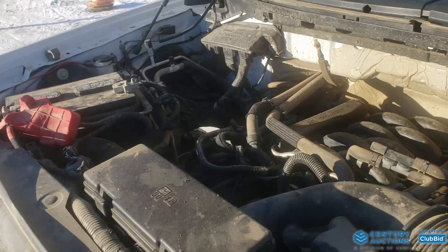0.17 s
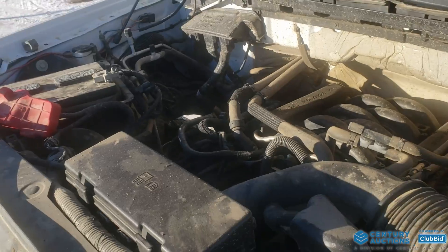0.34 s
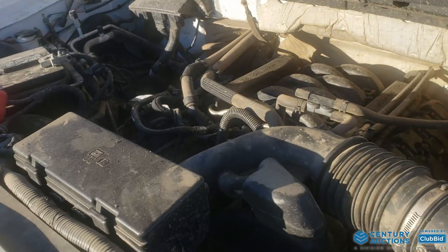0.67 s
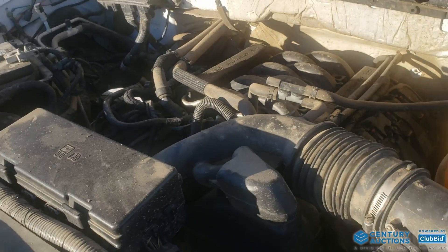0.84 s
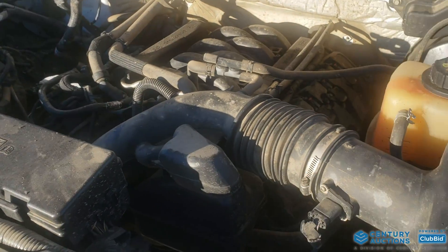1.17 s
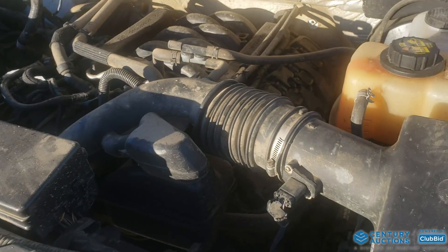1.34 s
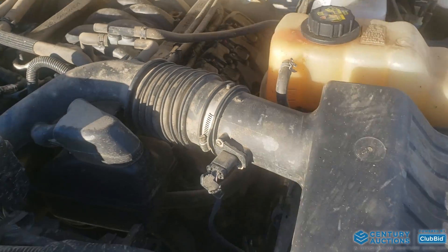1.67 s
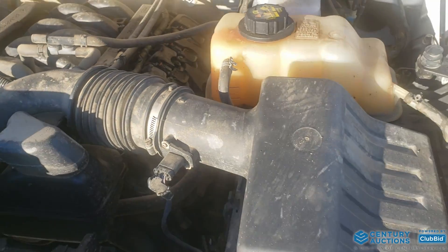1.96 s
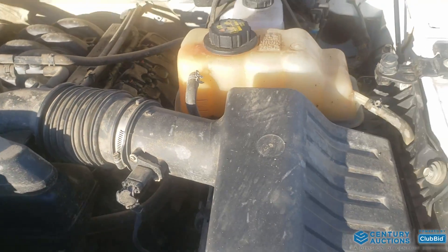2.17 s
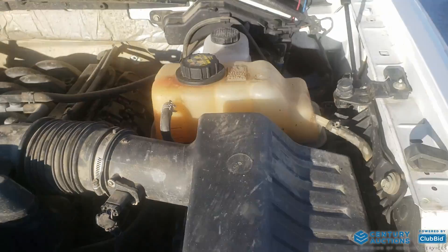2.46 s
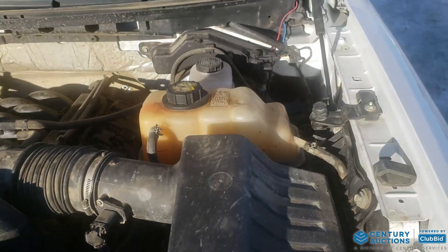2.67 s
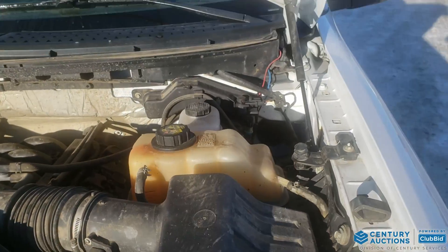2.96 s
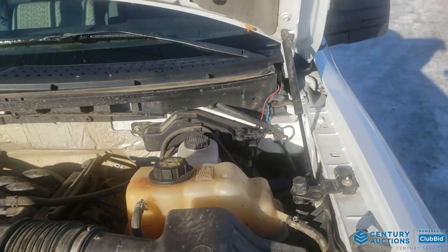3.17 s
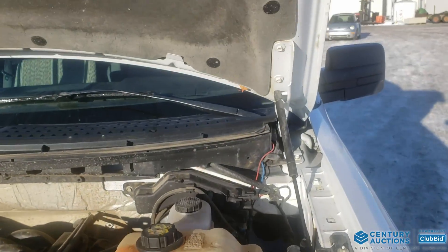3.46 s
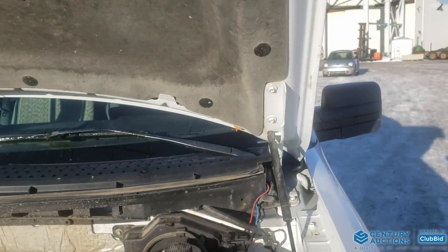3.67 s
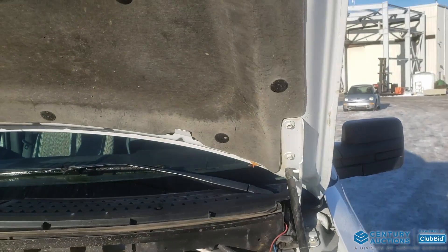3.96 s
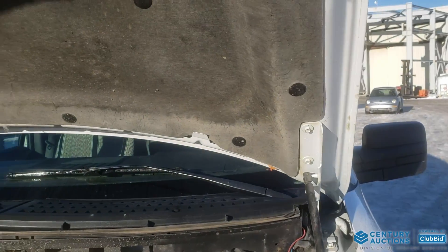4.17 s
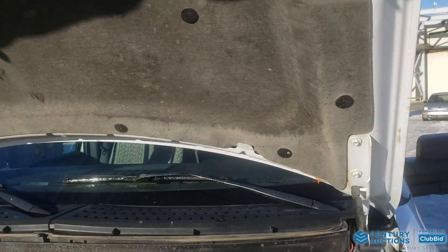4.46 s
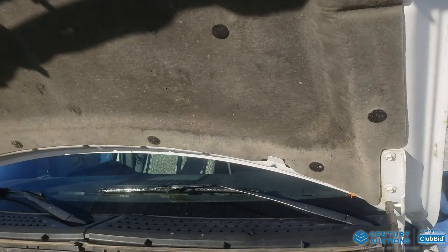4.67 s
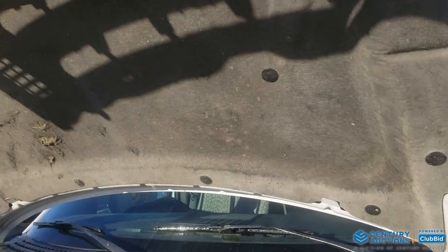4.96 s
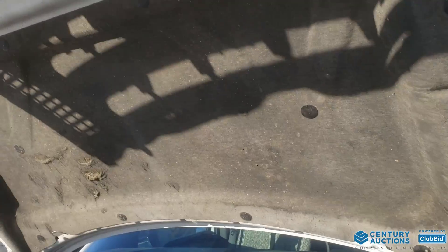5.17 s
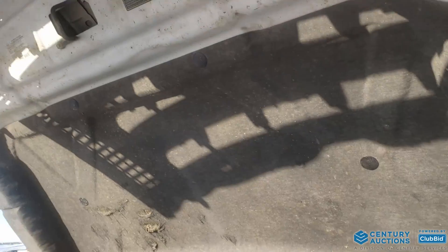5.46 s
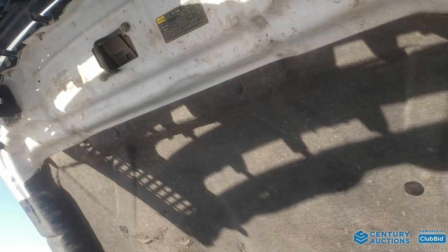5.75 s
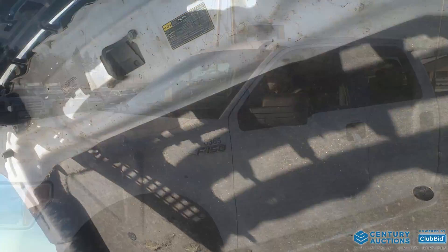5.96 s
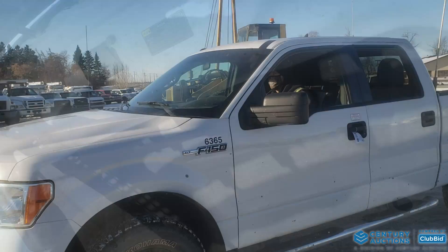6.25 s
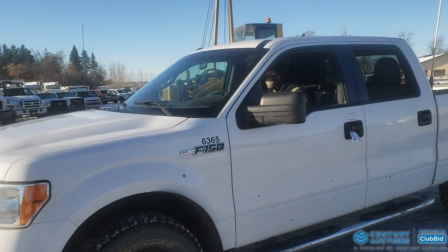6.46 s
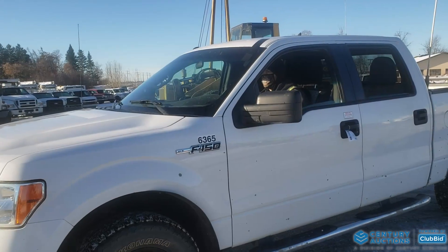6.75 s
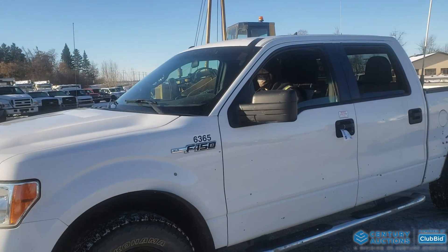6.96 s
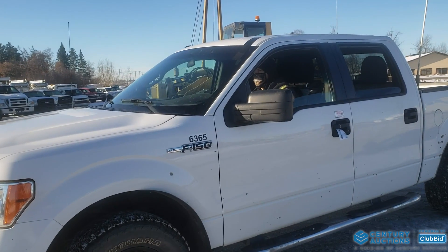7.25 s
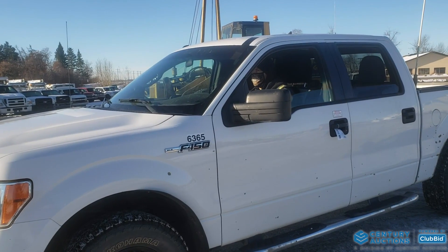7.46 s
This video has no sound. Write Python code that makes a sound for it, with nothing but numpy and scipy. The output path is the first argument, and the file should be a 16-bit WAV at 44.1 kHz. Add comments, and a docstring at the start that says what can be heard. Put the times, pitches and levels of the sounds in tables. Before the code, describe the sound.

The microphones are close over the open bay of a parked V8 pickup outdoors. It starts at a low, clattering idle with a soft exhaust rumble. At about 0.3 s the throttle opens with a breathy gasp and a deep duct thump; the intake booms and growls as revs race up, peaking near 0.95 s with a hissing rush of air. The throttle shuts just after 1 s and the pitch sinks slowly until about 3.2 s, with metallic ringing, valve chatter, belt-drive whine and a thin, fluttering high whistle. At 3.2 s a second quick blip, with a weaker gasp but harder bark, climbs higher to about 3.75 s, then coasts down for over two seconds. From 5.9 to 6.4 s this dissolves into the truck idling a few metres away: much quieter, low uneven exhaust puffs, light ticking that rises again near 7.3 s, faint tones and open-yard noise until the end.

```python
"""A V8 pickup engine in park, blipped twice, with the microphones over its open bay.
The throttle gasps and hisses with noise; the intake booms at the firing pitch; repeating shocks ring the
block, covers and exhaust; sines locked to the crank give the belt-drive whine and a chord of orders.
As the revs sink, narrow noise strands whistle past the shut throttle. Near the end this dissolves into
the same truck idling a few metres away in an open yard: exhaust puffs, clatter, tones and yard noise."""
import sys
import numpy as np
from scipy import signal
from scipy.fft import rfft, irfft, next_fast_len
from scipy.io import wavfile
from scipy.ndimage import uniform_filter1d, map_coordinates

SR = 44100
rng = np.random.default_rng(int(sys.argv[2]) if len(sys.argv) > 2 else 0)


def wav_record(signal):
    """Record a signal, one row per channel, as 16-bit PCM in the file named by sys.argv[1]."""
    frames = np.transpose(np.atleast_2d(signal))
    bounded = np.clip(frames, -1, 1)
    # unit amplitude maps onto the largest positive 16-bit level
    quanta = np.round(bounded * 32767).astype(np.int16)
    wavfile.write(sys.argv[1], SR, quanta)


N = 336041

# Crank speed, smoothed later: time_s, speed_rpm
CRANK_SPEED = [(.3, 930), (.45, 1362), (.57, 1885), (.72, 2714), (.88, 3378), (.96, 3441), (1.05, 3345),
               (1.2, 2976), (1.6, 2610), (2, 2152), (2.3, 1865), (2.9, 1453), (3.18, 1365), (3.25, 1610),
               (3.37, 2206), (3.56, 3350), (3.64, 3735), (3.7, 3860), (3.74, 3885), (3.79, 3845),
               (3.89, 3680), (3.94, 3570), (4.2, 3310), (4.3, 3185), (4.9, 2288), (5.4, 1790), (6.2, 1320)]
FULL_LOAD_RPM_PER_S = 5800  # climb of the revs under full load
MANIFOLD_FILL_S = 0.034  # lag of the load as it builds and dies away
# Pedal blips: opens_s, shuts_s, gasp_db, rush_db, gulp_db,
# then trims: boom_db, block_db, roar_db, valves_db, whine_db, whistle_db
BLIPS = [(0.331, 1.038, -30.5, -29, -23, 2.5, -0.012, -7.5, 0.83, -4, -0.11),
         (3.2, 3.61, -57, -39, -36, 0, 0.071, 0.5, 0.045, -0.5, 2.5)]

# Loudness laws: coast_db at MID_RPM, coast_db_per_octave of speed, extra_db_per_octave above KNEE_RPM,
# full_load_db at MID_RPM, full_load_db_per_octave
AIRBOX_LAW = (-40.5, 3.5, 7, -29.5, 10.5)
BLOCK_LAW = (-36, 2, 9, -29.5, 6.5)
VALVE_LAW = (-35.5, 9, 6.5, -37, 14)
HISS_LAW = (-42.5, 1, 13.5, -45, -18)
EXHAUST_LAW = (-37.5, -3.5, 15.5, -25.5, -6.5)
LOW_RPM, MID_RPM, KNEE_RPM = 1300, 2076, 2700  # the per-octave slopes go flat below LOW_RPM
ROAR_GROWTH, BOOM_GROWTH = 0.79, 1.8  # powers of the load for combustion noise and boom

# Firing tone at its own pitch, before the blip trim, under load and at any load: pitch_hz, level_db
BOOM = [(62, -20), (76, -23), (91, -1), (105, -2), (126, -6.5), (150, -14.5), (180, -26), (245, -43)]
HUM = [(60, -43), (90, -53), (120, -42), (150, -37), (175, -31.5), (215, -37.5), (255, -33.5)]
# Once a cycle the boom drops out between two surges: place_cycles, width (in sine of phase), depth_ratio
STUMBLE = (.005, .3, .75)
# Overtones of the firing before the duct: crank_multiple, level_db
GROWL_ORDERS = [(8, 0), (12, -1)]
# The duct's answer to those overtones: frequency_hz, gain_db
GROWL_DUCT = [(90, -43), (130, -31), (165, -15.5), (195, -30), (230, -26), (270, -20.5), (300, -26.5),
              (345, -57), (500, -69)]
# Colour of the intake gulps: frequency_hz, level_db (per Hz)
INTAKE_DUCT = [(45, -31), (85, -3), (160, -5), (230, -16), (280, -6.5), (350, -52), (900, -70)]
GULP_HZ, GULP_DELAY_S, GULP_WIDTH_S = 118, 0.01, 0.03  # the duct's thump as the throttle opens

# Air at the throttle, hiss and draught: frequency_hz, level_db (per Hz)
HISS_COLOUR = [(1200, -36), (2500, 3), (5000, 7), (6200, -2), (7600, 4.5), (9000, -0.5), (10500, 2),
               (13000, 5.5), (14500, 3), (15900, -0.5)]
THROAT = [(1500, -4.5), (2400, 2), (3400, -1), (5500, -1), (7700, -4), (8500, -14), (12000, -40)]
GASP_RISE_S, GASP_FALL_S = 0.084, 0.017  # around the moment the plate cracks open
RUSH_ATTACK_S, RUSH_RELEASE_S = 0.55, 0.057
HISS_GASP_DB, HISS_OPEN_DB = -32.5, -35.5  # what gasp and open plate add to the hiss

# Bark of combustion: frequency_hz, level_db (per Hz)
ROAR = [(350, -34), (430, 1), (470, -12), (520, 4.5), (570, -6), (640, 5.5), (800, -5), (920, -7.5),
        (1080, -11), (1200, -4), (1500, -49)]
ROAR_DB, ROAR_DB_PER_OCTAVE = -26.5, 12.5  # at MID_RPM under full load, before the blip trim

# Fixed resonances of airbox, block, casing, valve covers, loose covers: frequency_hz, level_db (per Hz)
AIRBOX = [(120, -17), (200, -4.5), (255, -3.5), (285, -2.5), (315, -0.5), (355, -8.5), (450, -19),
          (700, -51)]
BLOCK = [(250, -36), (370, -5), (425, 1), (500, -1), (570, 4), (630, 1.5), (665, 2.5), (715, 0.5),
         (800, -0.5), (900, -4.5), (1050, -8), (1400, -51)]
CASING = [(540, -22), (630, -5.5), (668, -0.5), (705, -13), (790, -44)]
VALVES = [(700, -9.5), (1050, 0), (1280, 3.5), (1480, -2), (1650, -4.5), (2200, -4.5), (2520, -5.5),
          (2850, -7.5), (3700, -8.5), (4300, -8.5), (5000, -15), (5600, -16), (9000, -22.5)]
CHATTER = [(700, -32), (860, 4), (1000, -12), (1300, 1), (1600, -15), (2300, -24), (2540, 5), (2750, -24),
           (3900, -21), (4300, 1), (4800, -30), (8000, -50)]
CASING_DB, CHATTER_DB = -35.5, -46  # before speed, wavering and blip trim
CASING_RPM, CASING_WIDTH_OCTAVES = 1830, 0.2  # speed at which the casing rings most
CASING_FLOOR = 0.16  # share of the casing's gain far from that speed
# Once a cycle a cylinder knocks the casing harder: place_cycles, width (in sine of phase), extra_gain_ratio
KNOCK = (.55, .5, 1.6)

# Orders flaring at resonances of block, brackets and pulleys: crank_multiple, best_rpm, width_rpm, level_db
FLARES = [(3, 2150, 330, -41), (8, 3430, 190, -33), (8, 3060, 120, -37), (8, 3780, 110, -39),
          (8, 2300, 200, -45), (12, 3320, 190, -29.5), (12, 3700, 200, -41), (12, 2300, 450, -48),
          (14.5, 2820, 180, -41), (15.3, 3350, 300, -39), (15.3, 2450, 500, -42), (16, 3390, 170, -36.5),
          (16, 2950, 230, -36), (16, 2250, 350, -45), (18.35, 3460, 230, -34), (18.35, 2950, 130, -41),
          (18.35, 2480, 250, -43), (20, 3140, 110, -40), (20, 1930, 130, -43), (21, 1890, 170, -39),
          (22.5, 3140, 140, -36), (23.8, 3400, 170, -40), (23.8, 2200, 500, -44), (28, 1410, 50, -42),
          (30.3, 2510, 120, -43)]
# Orders shouted by the open intake under load: crank_multiple, best_rpm, width_rpm, level_db
INTAKE_FLARES = [(3, 2150, 330, -22), (5, 3730, 260, -21), (5, 3300, 130, -30), (5.5, 3550, 200, -24),
                 (6, 3000, 250, -27), (8, 3180, 200, -28), (14.5, 3000, 220, -32), (16, 2600, 450, -30),
                 (18.35, 3050, 200, -35)]
# Trim of the whole chord: time_s, level_db
CHORD_LEVEL = [(.7, 0), (1.05, 3), (1.5, .5), (3.7, -1), (3.9, -1.5)]
SHAFT_FLUTTER_TURNS, FLARE_WAVER_DB = .0026, 2

# Whine and companions, relative to the whine: crank_multiple, level_db
WHINE_ORDERS = [(24.47, 0), (27.55, -15), (42.7, -9.5)]
# Ringing of the alternator's housing and bracket, before the blip trim: frequency_hz, level_db
WHINE_BODY = [(500, -64), (880, -49), (1080, -47), (1140, -37), (1185, -38), (1245, -29), (1280, -38),
              (1320, -47), (1360, -30), (1405, -24.5), (1460, -31), (1490, -35), (1520, -28), (1580, -21.5)]

# Centre of the whistle: speed_rpm, pitch_hz
WHISTLE_PITCH = [(1320, 11550), (1480, 11900), (1800, 12250), (2050, 12700), (2400, 12950), (3000, 13000),
                 (3700, 13450)]
# Narrow strands around that centre: offset_hz, level_db
STRANDS = [(-470, -5), (0, 2), (420, -2), (880, -7), (2150, -13)]
BORE_SPACING_HZ, BORE_RIPPLE_DB = 307, 3.5  # evenly spaced resonances of the throttle bore
WHISTLE_DB, WHISTLE_SWELL_DB = -47.5, 6  # base, and swell at the best speed, before the blip trim
WHISTLE_RPM, WHISTLE_WIDTH_OCTAVES = 1780, 0.87

# Exhaust rumble from under the truck: frequency_hz, level_db (per Hz)
RUMBLE = [(18, -39), (35, -50), (52, -3.5), (80, -2.5), (115, 6), (160, 1.5), (220, -4), (330, -13),
          (800, -32)]
# Tones from the uneven firing of each bank, before the pipe: crank_multiple, level_db
EXHAUST_ORDERS = [(1.5, -40.5), (3, -44)]
# The pipe's answer to them: frequency_hz, gain_db
PIPE = [(30, -22), (45, -10), (57, 2), (64, 1), (80, -2), (140, -1), (200, 3)]
LOPE = .3  # depth of the rumble's swing once a cycle

# Left-right likeness over the bay and out in the yard: frequency_hz, likeness_ratio
BAY_ALIKE = [(100, 1), (300, 0.93), (700, 0.76), (1400, 0.18), (2800, 0.24), (12000, 0)]
YARD_ALIKE = [(100, 0.86), (600, 1), (1500, 0.48), (5000, 0.12)]
# The microphones swing across the bay: time_s, left_lead_ms
BEARING = [(0, -0.2), (1.25, -0.045), (2.3, 0.12), (2.8, 0.25), (3.25, .24), (3.65, 0.085), (4.25, 0.13),
           (5.2, 0.05), (6, -0.06)]
# The two microphone ports differ in the bass: frequency_hz, left_lead_rad
PORT_PHASE = [(40, -.3), (110, -0.31), (300, -0.29), (800, -0.24)]
LOW_CUT_HZ, TOP_HZ = 36, 15900  # band of the microphones

# Dissolve from bay to yard: start_s, end_s
DISSOLVE = (5.87, 6.42)
IDLE_RPM = 585  # mean speed
# Eight exhaust puffs of a cycle, from the near bank or the far one: level_db
BANK_DB = [0, -8, 0, 0, -8, 0, -8, -8]
PUFF_LENGTH = 0.27  # decay of a puff as a share of the firing interval
# Tones at idle: crank_multiple, level_db
IDLE_ORDERS = [(6, -50), (12, -51), (16, -49.5), (18.35, -54), (24.47, -55), (86.1, -63)]
# Colours of idle puffs, valve clatter and open yard: frequency_hz, level_db (per Hz)
TAILPIPE = [(50, -25), (90, -7), (150, 1), (230, -0.5), (310, -10), (600, -35)]
CLATTER = [(900, -25), (1300, 2), (1520, 7), (1750, -10), (2150, -7), (2800, -29)]
YARD = [(13, -40), (22, -21), (43, -8), (64, -16), (82, -6.5), (128, -9.5), (248, -16), (300, -21),
        (830, -14.5), (1090, -18.5), (1480, -24.5), (2860, -38.5), (10100, -44), (15800, -46)]
# Idle clatter: time_s, level_db
CLATTER_LEVEL = [(6.4, -58), (6.9, -69), (7.35, -51), (7.6, -51.5)]


def amp(db):
    """Decibels to gain."""
    return 10 ** (np.asarray(db) / 20)


def unit(x):
    """Scale to rms 1."""
    return x / np.sqrt(np.mean(x ** 2) + 1e-20)


def along(points, x):
    """Second column of a table read at x, on a log axis."""
    place, value = np.transpose(points)
    return np.interp(np.log(x + 1), np.log(place + 1), value)


def curves(rows):
    """One value per sample for each column after the time."""
    s, *cols = np.transpose(rows)
    return [np.interp(np.arange(N) / SR, s, c) for c in cols]


def wobble(rate, size=32):
    """A smooth random curve, rate knots a second."""
    steps = np.arange(0, N + size, size)
    knots = rng.standard_normal(int(N * rate / SR) + 4)
    coarse = map_coordinates(knots, [steps * rate / SR])
    return np.interp(np.arange(N), steps, coarse)


def filtered(x, response):
    """x through a response given as a function of frequency in Hz."""
    m = next_fast_len(N + SR // 2)
    return irfft(rfft(x, m) * response(np.fft.rfftfreq(m, 1 / SR)), m)[..., :N]


def radiate(pair, spectrum, alike):
    """Two excitations coloured by a body and spread to left and right; the middle has rms 1."""
    def mid_and_side(hz):
        turn = np.arccos(np.clip(along(alike, hz), -1, 1)) / 2
        return amp(along(spectrum, hz)) * np.array([np.cos(turn), np.sin(turn)])

    mid, side = filtered(pair, mid_and_side)
    return np.array([mid + side, mid - side]) / np.std(mid)


def tones(turns, orders, waver_db):
    """Sines locked to the crank, each wavering in strength."""
    total = 0
    for multiple, db in orders:
        gain = np.sqrt(2) * amp(db + waver_db * wobble(9))
        total = total + gain * np.sin(2 * np.pi * (multiple * turns + rng.random()))
    return total


def once_a_cycle(turns, place, width, size):
    """A smooth bump every two turns of the crank."""
    return size * np.exp(-(np.sin(np.pi * (turns / 2 - place)) / width) ** 2)


def firings(turns, depth, count=8):
    """A swell at each firing, four to a turn; every cylinder has its own strength."""
    shot = (turns * count / 2).astype(int)
    size_db = rng.uniform(-4, 4, count)[shot % count] + rng.uniform(-3, 3, N)[shot]
    swell = np.sin(np.pi * turns * count / 2) ** 2
    share = np.clip(depth, 0, 1)
    return unit(1 - share + 2 * share * swell * amp(size_db))


def machinery(turns, rough, depth, size=512, count=5):
    """Shocks that repeat every two turns and slowly change, mixed with turbulence and pulsed by the firings."""
    cycles = turns / 2
    patterns = rng.standard_normal((2, int(cycles[-1] / count) + 3, size))
    place = [cycles / count, cycles * size % size]
    locked = np.array([map_coordinates(p, place, mode="grid-wrap") for p in patterns])
    locked *= np.sqrt(np.gradient(cycles) * size)  # the same power per Hz at any speed
    share = np.clip(rough, 0, 1)
    mix = np.sqrt(1 - share) * locked + np.sqrt(share) * rng.standard_normal((2, N))
    lope = 1 + 0.076 * np.sin(2 * np.pi * cycles)  # the cylinders do not pull evenly
    return mix * firings(turns, depth) * lope * amp(1.06 * wobble(22.003))


def loudness(law, rpm, load):
    """Gain of a part: friction noise that grows with speed, plus combustion noise that grows with load."""
    coast_db, slope_db, steeper_db, pull_db, pull_slope_db = law
    octaves = np.log2(np.maximum(rpm, LOW_RPM) / MID_RPM)
    above_knee = np.maximum(np.log2(rpm / KNEE_RPM), 0)
    coast = amp(coast_db + slope_db * octaves + steeper_db * above_knee)
    pull = load ** ROAR_GROWTH * amp(pull_db + pull_slope_db * octaves)
    return np.hypot(coast, pull)


def crank():
    """Speed in rpm, and the load (0-1) that it takes to speed the crank up."""
    rpm = uniform_filter1d(curves(CRANK_SPEED)[0], size=SR // 40)
    demand = np.clip(np.gradient(rpm) * SR / FULL_LOAD_RPM_PER_S, 0, 1)
    keep = np.exp(-1 / (MANIFOLD_FILL_S * SR))
    return rpm, signal.lfilter([1 - keep], [1, -keep], demand)


def blip_trims():
    """Boom, block, roar, valve train, whine and whistle dB of each blip, held until the next one."""
    opens, _, _, _, _, *trims = np.transpose(BLIPS)
    latest = np.maximum(np.searchsorted(opens, np.arange(N) / SR) - 1, 0)
    return [uniform_filter1d(db[latest], size=SR // 10) for db in trims]


def intake(turns, rpm, load, boom_db):
    """Firing tone: a clean hum at any load; under load a boom that stumbles once a cycle and a duct growl."""
    firing_hz = rpm * 4 / 60
    pull = load ** BOOM_GROWTH * amp(along(BOOM, firing_hz) + boom_db)
    stumble = 1.12 * (1 - once_a_cycle(turns, *STUMBLE))
    stroke = 2 * np.pi * 4 * turns + (.08 + .2 * load) * wobble(70)  # phase roughens with load
    uneven = amp(.9 * wobble(110))
    boom = pull * stumble * uneven * np.sin(stroke)
    hum = amp(along(HUM, firing_hz) + boom_db) * np.sin(stroke)
    firing_tone = np.sqrt(2) * amp(0.83 * wobble(30.03)) * (boom + hum)
    overtones = load * stumble * amp(boom_db) * tones(turns, GROWL_ORDERS, waver_db=0.5)
    growl = filtered(overtones, lambda hz: amp(along(GROWL_DUCT, hz)))
    gulps = radiate(machinery(turns, rough=0.31, depth=0.19), INTAKE_DUCT, BAY_ALIKE)
    return firing_tone + growl + amp(-10.0) * pull * stumble * gulps


def first_gulp():
    """The first air through the opening plate thumps the duct for a few cycles."""
    t = np.arange(N) / SR
    swell = 0
    for opens, _, _, _, gulp_db, *_ in BLIPS:
        swell = swell + amp(gulp_db) * np.exp(-((t - opens - GULP_DELAY_S) / GULP_WIDTH_S) ** 2)
    phase = 2 * np.pi * GULP_HZ * t
    return np.sqrt(2) * swell * (np.sin(phase) + 0.29 * np.sin(2 * phase))


def throttle(turns, rpm, load):
    """Air hisses past the plate; at each blip it gasps as the plate cracks open and rushes until it shuts."""
    t = np.arange(N) / SR
    hiss_power, throat = loudness(HISS_LAW, rpm, load) ** 2, 0
    for opens, shuts, gasp_db, rush_db, *_ in BLIPS:
        gasp = np.exp(-((t - opens) / np.where(t < opens, GASP_RISE_S, GASP_FALL_S)) ** 2)
        opening = np.clip((t - opens) / RUSH_ATTACK_S, 0, 1) ** .5
        rush = opening * np.clip(1 - (t - shuts) / RUSH_RELEASE_S, 0, 1)
        throat = throat + amp(gasp_db) * gasp + amp(rush_db) * rush
        hiss_power = hiss_power + amp(HISS_GASP_DB) ** 2 * gasp + amp(HISS_OPEN_DB) ** 2 * rush
    pulsed_air = rng.standard_normal((2, N)) * firings(turns, depth=0.14)
    hiss = radiate(pulsed_air, HISS_COLOUR, BAY_ALIKE)
    draught = radiate(rng.standard_normal((2, N)), THROAT, BAY_ALIKE)
    draught = draught * amp([[-2.5], [2.5]])  # stronger on the right
    return np.sqrt(hiss_power) * amp(1.26 * wobble(23.06)) * hiss + throat * draught


def roar(turns, rpm, load, roar_db):
    """Combustion barks through the block while the engine pulls, in ragged bursts."""
    speed_db = ROAR_DB_PER_OCTAVE * np.log2(rpm / MID_RPM)
    gain = load ** ROAR_GROWTH * amp(ROAR_DB + speed_db + roar_db)
    ragged = unit(amp(1.2 * wobble(45)))
    return gain * ragged * radiate(machinery(turns, rough=0.14, depth=0.38), ROAR, BAY_ALIKE)


def engine_body(turns, rpm, load, block_db, valves_db):
    """The engine's shocks ring the fixed resonances of airbox, block, casing and valve covers."""
    airbox = radiate(machinery(turns, rough=0.2, depth=0.2), AIRBOX, BAY_ALIKE)
    airbox = loudness(AIRBOX_LAW, rpm, load) * airbox

    block = radiate(machinery(turns, rough=0.59, depth=0.34), BLOCK, BAY_ALIKE)
    block = loudness(BLOCK_LAW, rpm, load) * block

    in_tune = np.exp(-(np.log2(rpm / CASING_RPM) / CASING_WIDTH_OCTAVES) ** 2)
    casing_gain = amp(CASING_DB + 1.8 * wobble(14)) * (CASING_FLOOR + (1 - CASING_FLOOR) * in_tune)
    knocks = unit(1 + once_a_cycle(turns, *KNOCK))
    casing = radiate(machinery(turns, rough=0.73, depth=0.46), CASING, BAY_ALIKE)
    casing = casing_gain * knocks * casing

    valves = radiate(machinery(turns, rough=0.89, depth=0.037), VALVES, BAY_ALIKE)
    valves = loudness(VALVE_LAW, rpm, load) * valves
    chatter_gain = amp(CHATTER_DB + 2.9 * wobble(35)) * np.minimum(rpm / MID_RPM, 1) ** 3
    chatter = radiate(machinery(turns, rough=0.12, depth=0.64), CHATTER, BAY_ALIKE)
    covers = valves + chatter_gain * chatter

    # block, casing and covers lean to the right
    metal = amp(block_db) * (block + casing) * amp([[-.3], [.3]])
    return airbox + metal + amp(valves_db) * covers * amp([[-.9], [.9]])


def flares(table, order, rpm):
    """Strength of one crank order, swelling around its best speeds."""
    return sum(amp(db) * np.exp(-((rpm - best) / width) ** 2)
               for k, best, width, db in table if k == order)


def block_tones(turns, rpm, load):
    """The engine's chord, one tone per order: the block sounds at any load, the intake only while it pulls."""
    shaft, chord = turns + SHAFT_FLUTTER_TURNS * wobble(45), 0
    for order in sorted({row[0] for row in FLARES + INTAKE_FLARES}):
        gain = flares(FLARES, order, rpm) + np.sqrt(load) * flares(INTAKE_FLARES, order, rpm)
        waver = amp(FLARE_WAVER_DB * wobble(24))
        chord = chord + gain * waver * np.sin(2 * np.pi * (order * shaft + rng.random()))
    return np.sqrt(2) * amp(curves(CHORD_LEVEL)[0]) * chord


def alternator(turns, rpm, trim_db):
    """A belt-driven whine swells at the housing's resonances; companions join near the top speed."""
    whine, *companions = WHINE_ORDERS
    whine_db = along(WHINE_BODY, whine[0] * rpm / 60) + trim_db
    pulley = turns + .0015 * wobble(25)  # slight flutter, in turns
    near_top = (rpm / rpm.max()) ** 4
    voices = tones(pulley, [whine], waver_db=.5) + near_top * tones(pulley, companions, waver_db=1)
    return amp(whine_db + wobble(40)) * voices


def whistle(rpm, trim_db):
    """The throttle gap whistles in fluttering noise strands that follow the revs across the bore's resonances."""
    swell = np.exp(-(np.log2(rpm / WHISTLE_RPM) / WHISTLE_WIDTH_OCTAVES) ** 2)
    centre_hz = along(WHISTLE_PITCH, rpm)
    strands = 0
    for offset_hz, db in STRANDS:
        # slow noise times a sine makes a narrow band around the sine's pitch
        band = filtered(rng.standard_normal((2, N)),
                        lambda hz: 1 / np.sqrt(1 + (hz / 110) ** 2 + (hz / 260) ** 4))
        flutter = amp(2.6 * wobble(40) + .9 * wobble(4))
        pitch_hz = centre_hz + offset_hz + 70 * wobble(9)
        strands = strands + amp(db) * flutter * band * np.sin(2 * np.pi * np.cumsum(pitch_hz) / SR)
    bore = filtered(strands, lambda hz: amp(BORE_RIPPLE_DB * np.cos(2 * np.pi * hz / BORE_SPACING_HZ)))
    level_db = WHISTLE_DB + WHISTLE_SWELL_DB * swell + trim_db + 1.3 * wobble(26)
    return amp(level_db) * unit(bore)


def exhaust(turns, rpm, load, boom_db):
    """Low rumble from under the truck, loping once a cycle; bank tones swell as they pass the pipe's resonance."""
    pulses = machinery(turns, rough=.6, depth=.35) * (1 - LOPE * np.cos(np.pi * turns))
    rumble = amp(boom_db) * loudness(EXHAUST_LAW, rpm, load) * radiate(pulses, RUMBLE, BAY_ALIKE)
    bank_tones = filtered(tones(turns, EXHAUST_ORDERS, waver_db=0.5), lambda hz: amp(along(PIPE, hz)))
    return rumble * amp([[.4], [-.4]]) + bank_tones  # rumble slightly to the left


def distant_idle():
    """The idling truck from the side: uneven exhaust puffs, pulley tones, light clatter and the open yard."""
    turns = np.cumsum(IDLE_RPM + 2 * wobble(3)) / SR / 60
    shot, part = np.divmod(4 * turns, 1)  # number of the puff, and place within it
    strength = amp(np.array(BANK_DB))[shot.astype(int) % len(BANK_DB)]
    puffs = strength * (1 - np.exp(-part / .08)) * np.exp(-part / PUFF_LENGTH)
    shapes = rng.standard_normal((2, 64))
    same_puff = np.array([np.interp(part, np.linspace(0, 1, s.size), s) for s in shapes])
    gas = .3 * unit(same_puff) + rng.standard_normal((2, N))  # a repeating shape plus turbulence
    putter = amp(-48.0) * radiate(puffs * gas, TAILPIPE, YARD_ALIKE)

    taps = rng.standard_normal((2, N)) * firings(turns, depth=0.43)
    clatter = amp(curves(CLATTER_LEVEL)[0]) * radiate(taps, CLATTER, YARD_ALIKE)
    yard = amp(-41.5) * radiate(rng.standard_normal((2, N)), YARD, YARD_ALIKE)
    thin_tone = amp(-76) * np.sin(2 * np.pi * 9780 * np.arange(N) / SR)
    return putter + clatter + yard + thin_tone + tones(turns, IDLE_ORDERS, waver_db=0.5)


def arrive(pair, lead_ms):
    """The sound reaches one microphone before the other."""
    half = lead_ms * SR / 2000  # half the lead, in samples
    return np.array([map_coordinates(ch, [np.arange(N) + side * half], order=3, mode="mirror")
                     for ch, side in zip(pair, (1, -1))])


def scene():
    """All parts of the engine follow one crank's speed and load; the near sound dissolves into the far one."""
    rpm, load = crank()
    boom_db, block_db, roar_db, valves_db, whine_db, whistle_db = blip_trims()
    lead_ms, = curves(BEARING)
    turns = np.cumsum(rpm) / SR / 60
    bay = intake(turns, rpm, load, boom_db) + first_gulp() + throttle(turns, rpm, load)
    bay = bay + roar(turns, rpm, load, roar_db) + engine_body(turns, rpm, load, block_db, valves_db)
    bay = bay + block_tones(turns, rpm, load) + alternator(turns, rpm, whine_db)
    bay = bay + whistle(rpm, whistle_db) + exhaust(turns, rpm, load, boom_db)
    far = np.interp(np.arange(N) / SR, DISSOLVE, [0, 1])
    return (1 - far) * arrive(bay, lead_ms) + far * arrive(distant_idle(), lead_ms=0.43)


def record(dry):
    """The microphone ports thin and phase-shift the bass; loud peaks are rounded off; the top is cut."""
    def ports(hz):
        low_cut = hz ** 3 / np.hypot(hz ** 3, LOW_CUT_HZ ** 3)
        return low_cut * np.exp(np.array([[.5j], [-.5j]]) * along(PORT_PHASE, hz))

    ported = filtered(dry, ports)
    rounded = ported / (1 + np.abs(ported) ** 8) ** (1 / 8)
    return filtered(rounded, lambda hz: hz < TOP_HZ)


dry = scene()
out = record(dry)
wav_record(out)
```